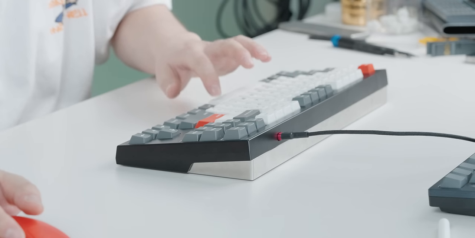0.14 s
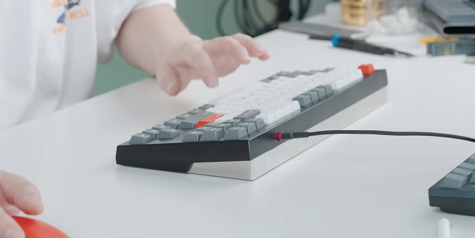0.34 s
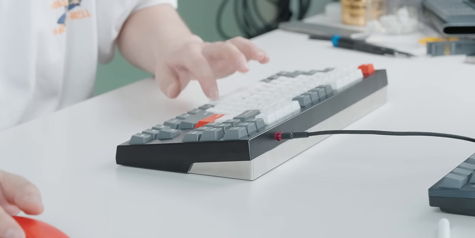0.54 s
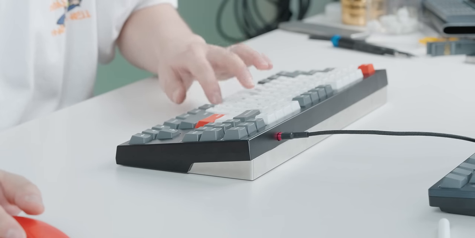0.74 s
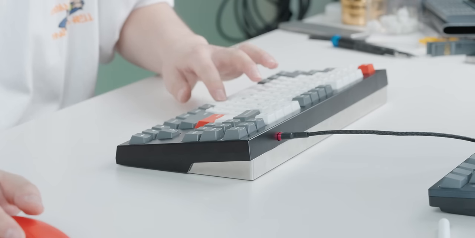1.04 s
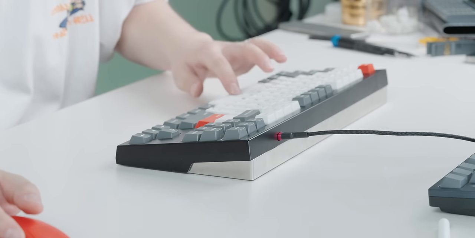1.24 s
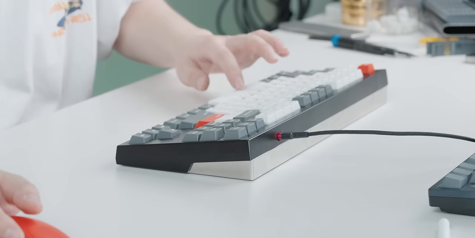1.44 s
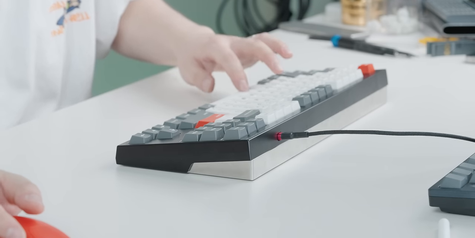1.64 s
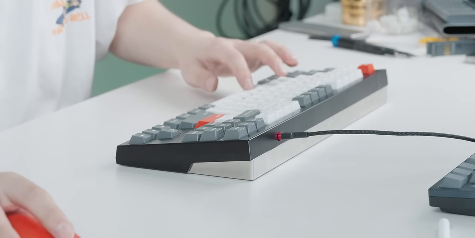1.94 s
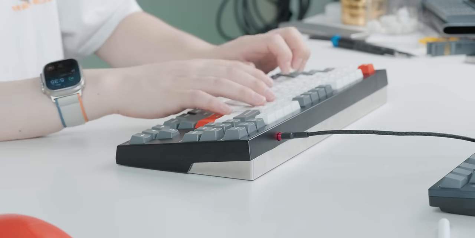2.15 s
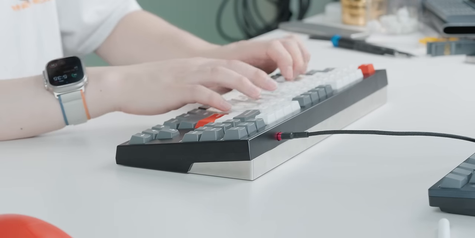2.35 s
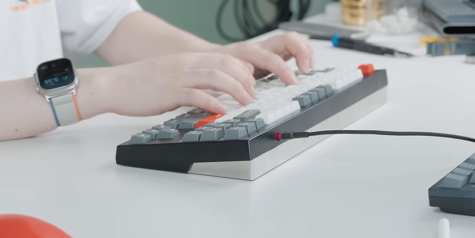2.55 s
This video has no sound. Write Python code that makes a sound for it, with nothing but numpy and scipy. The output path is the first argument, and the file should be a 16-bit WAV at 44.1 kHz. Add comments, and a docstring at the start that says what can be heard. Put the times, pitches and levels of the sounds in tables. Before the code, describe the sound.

Sharp, hard keyboard key taps with softer release clicks, ending in quick uneven two-handed typing

```python
"""One finger taps a wide key of a metal-cased mechanical keyboard on a desk, then both hands type on small keys.
Each stroke is a blow and a rebound: a decaying cap tone, decaying case modes and a crack of coloured noise.
The stem bottoms out on the press and springs back against its stop on the return.
Landing fingertips tick on the caps as noise bursts and a dull tone; brushing fingers hiss as filtered noise.
Noise tails and one wall echo form the room's answer; low filtered noise rumbles in the gaps."""
import sys
import numpy as np
from scipy import signal
from scipy.fft import rfft, irfft, next_fast_len
from scipy.io import wavfile

SR = 44100
rng = np.random.default_rng(int(sys.argv[2]) if len(sys.argv) > 2 else 0)


def log_audio(samples):
    """Write samples as a 16-bit WAV file to the path given in sys.argv[1]."""
    # one column per channel
    frames = np.atleast_2d(samples).T
    # limit to full scale, then quantise
    limited = np.clip(frames, -1, 1)
    pcm = np.round(limited * 32767).astype(np.int16)
    wavfile.write(sys.argv[1], SR, pcm)


N = 119070

# Strokes of the wide key bottoming out, of its springing back, and of the small keys:
# start_s, level_db (peak of the direct blow), cap_pitch_hz, case_db (against the cap),
# rebound_delay_s, rebound_db (against the blow)
WIDE_PRESSES = [(0.118, -0.5, 2100, -15.6, 0.0025, -8.3), (0.2952, -1.5, 2050, -15.0, 0.0014, -13.0),
                (0.4602, -1.1, 2050, -14.5, 0.0023, -12.4), (0.6237, -2.0, 2020, -14.0, 0.002, -13.8),
                (0.7863, -2.7, 2040, -13.9, 0.0023, -8.3), (0.9415, -4.4, 2000, -15.4, 0.0023, -5.2),
                (1.1067, -10.7, 2040, -18.1, 0.0024, -6.1), (1.246, -6.8, 2060, -15.5, 0.0026, -4.8),
                (1.3864, -5.9, 2040, -14.7, 0.0027, -5.9), (1.5378, -6.8, 2020, -13.8, 0.0023, -5.3),
                (1.6841, -6.7, 2020, -13.9, 0.002, -9.7), (1.8327, -5.5, 2010, -14.8, 0.0021, -10.6),
                (1.9655, -2.7, 2010, -15.6, 0.0021, -14.4), (2.4859, -6.3, 2110, -11.6, 0.0022, -6.7)]
WIDE_RETURNS = [(0.1971, -11.1, 1850, -19.2, 0.0062, -12.0), (0.3644, -13.2, 1830, -18.2, 0.0028, -13.3),
                (0.5314, -13.6, 1820, -16.9, 0.0053, -12.9), (0.691, -12.8, 1830, -16.1, 0.0028, -13.5),
                (0.856, -14.7, 1830, -17.1, 0.0049, -7.0), (1.0201, -16.7, 1820, -18.9, 0.0048, -8.0),
                (1.1717, -19.0, 1790, -18.9, 0.0045, -8.5), (1.3186, -19.3, 1810, -17.7, 0.004, -10.6),
                (1.4602, -17.6, 1810, -18.5, 0.0045, -9.2), (1.6038, -15.5, 1820, -17.7, 0.0046, -7.3),
                (1.751, -14.3, 1810, -17.8, 0.0052, -8.6), (1.893, -13.4, 1830, -18.0, 0.0025, -16.8),
                (2.0407, -13.4, 1820, -16.9, 0.0052, -10.4)]
SMALL_STROKES = [(2.238, -23.2, 3850, -3.1, 0.0016, -7.8), (2.2568, -15.9, 3060, -8.1, 0.0021, -13.4),
                 (2.3207, -10.9, 3600, -3.8, 0.002, -19.0), (2.3687, -22.8, 1750, -1.1, 0.0035, -19.5),
                 (2.3835, -14.4, 4350, -3.1, 0.0022, -14.1), (2.5547, -12.5, 3500, -4.5, 0.0031, -6.9),
                 (2.6288, -30.4, 1610, -5.5, 0.0017, -7.5), (2.6502, -13.8, 3650, -4.6, 0.0026, -17.3)]
# How each kind of stroke excites the key: cap_t60_s, mode_t60_factor, attack_s, tilt_db_per_octave,
# crack_db, crack_t60_s, rebound_pitch_ratio, room_db
PRESS_KIND = (.0075, 1.05, .00017, -.4, -25, .008, .97, -.1)
RETURN_KIND = (.0065, 1.8, .00017, -3.5, -27.5, .02, .85, 2.5)
SMALL_KIND = (.004, 1.05, .00012, .1, -19, .008, .52, 2)
# Modes of plate and case, before each stroke's tilt, scatter and t60 factor:
# pitch_hz, level_db, t60_s, polarity (against the cap)
WIDE_KEY_MODES = [(370, -7, .02, 1), (700, -21, .02, -1), (1270, -1.5, .009, -1), (1560, 4, .013, -1),
                  (2680, 2, .009, -1), (2950, 3.5, .006, -1), (3620, -3, .007, 1), (4230, -6.5, .006, -1),
                  (4680, 0.5, .007, 1), (5200, -8, .006, 1), (6230, -5, .005, -1), (7900, -11, .005, 1),
                  (9220, -19, .006, -1), (12200, -11, .004, 1), (13900, -10.5, .004, -1)]
# Modes under the small keys: pitch_hz, level_db, t60_s, polarity (against the cap)
SMALL_KEY_MODES = [(390, -20, .015, 1), (1760, -11, .01, 1), (2200, -11, .007, -1), (2800, -7, .007, 1),
                   (3600, -3, .008, -1), (4600, -6, .005, 1), (6200, -11, .004, -1), (8000, -14, .004, 1),
                   (10400, -13, .004, -1), (12500, -16, .004, 1)]
# Spectrum of a crack: frequency_hz, level_db
CRACK_SPECTRUM = [(300, -22), (700, -10), (1500, -2), (5000, -3), (8500, -9), (12000, -10), (15000, -12),
                  (16500, -28)]
# Fingertips landing on a cap: start_s, level_db, dull_delay_s, dull_db (against the level)
FINGER_TOUCHES = [(.1075, -45, .004, 8), (.2825, -46, .004, 9), (.4475, -46, .004, 9), (.612, -46, .004, 8),
                  (.7741, -46, .004, 8), (.921, -48, .005, 8), (1.067, -53, .006, 8),
                  (1.2166, -54, .005, 8), (1.3538, -56, .004, 3), (1.508, -55, .004, 3),
                  (1.6586, -54, .004, 3), (1.8103, -55, .004, 3), (1.9355, -50, .013, 3),
                  (2.0144, -50, .006, 4), (2.3092, -42, .003, -5), (2.3441, -44, .002, 8),
                  (2.4119, -41, .003, -5), (2.4199, -41, .008, -5), (2.4563, -50, .005, -3),
                  (2.478, -36, .003, -3), (2.5311, -50, .004, -3), (2.635, -48, .003, -5),
                  (2.661, -46, .003, -5)]
# Fingers brushing over the caps: time_s, level_db
BRUSH_LEVEL = [(2.235, -110), (2.245, -64), (2.3, -66), (2.4, -62), (2.44, -66), (2.46, -58), (2.5, -60),
               (2.6, -62), (2.7, -66)]
# Spectrum of the brushing: frequency_hz, density_db_per_hz
BRUSH_SPECTRUM = [(500, -30), (1500, -1), (4000, -2), (7000, -13), (11000, -17), (16000, -30)]
# Decay of the room tail: frequency_hz, t60_s
ROOM_DECAY = [(300, .2), (2000, .25), (6000, .24), (14000, .21)]
# Spectrum of the room's answer: frequency_hz, level_db
ROOM_SPECTRUM = [(300, -6), (1100, -.5), (2000, -2), (3900, 5), (5000, .5), (7500, 7), (11000, 6),
                 (15000, 2.5)]
# Spectrum of the rumble: frequency_hz, density_db_per_hz
RUMBLE_SPECTRUM = [(15, -50), (40, -27), (65, -10), (95, -10), (125, -.1), (170, -5), (300, -7), (450, -16),
                   (750, -24), (1000, -34), (1500, -42), (2500, -52), (4000, -70), (16000, -80)]

BLOW_SAMPLES, ANSWER_SAMPLES = SR // 30, SR // 4
MODE_SCATTER_DB, LOW_CUT_HZ = 2.5, 900  # each key's ring is high-passed, so it carries little bass
TICK_T60_S, DULL_HZ, DULL_T60_S = .009, 1250, .012
SECOND_TICK_DB, SLIDE_DB, SLIDE_T60_S = -4, -10, .06  # slide: the stem rubbing in its guide
TAIL_DB, WALL_DELAY_S, WALL_DB, NEAR_DB, NEAR_T60_S = -25, .0115, -32, -21, .035
RUMBLE_DB = -58  # RMS
TOP_HZ = 16600


def keys(strokes, modes, kind):
    """Impact and restitution: each blow is followed by a rebound at its own pitch and level."""
    start_s, level_db, cap_hz, case_db, delay_s, rebound_db = np.transpose(strokes)[:, :, None]
    *_, pitch_ratio, room_db = kind
    t = blow_time(start_s)
    blow = contact(t, cap_hz, case_db, modes, kind)
    rebound = contact(t - delay_s, pitch_ratio * cap_hz, case_db, modes, kind)
    stroke = blow + amp(rebound_db) * rebound
    peak = abs(blow).max(axis=1, keepdims=True)
    return placed(start_s, amp(level_db) / peak * room(stroke, room_db))


def contact(t, cap_hz, case_db, modes, kind):
    """Modal excitation: a blow rings the cap and the case as decaying sines, with a noisy crack."""
    cap_t60, t60_factor, attack, tilt_db, crack_db, crack_t60, *_ = kind
    t = np.maximum(t, 0)
    cap = decay(t, cap_t60) * np.sin(2 * np.pi * cap_hz * t)
    scatter_db = MODE_SCATTER_DB * rng.standard_normal((len(t), len(modes)))
    case = 0
    for k, (hz, db, t60, polarity) in enumerate(modes):
        mode_db = db + tilt_db * np.log2(hz / cap_hz) + scatter_db[:, [k]]
        ring = decay(t, t60_factor * t60) * np.sin(2 * np.pi * hz * t)
        case = case + np.sign(polarity) * amp(mode_db) * ring
    onset = 1 - np.exp(-t / attack)
    body = (cap + amp(case_db) * case) * onset
    low_cut = signal.butter(2, LOW_CUT_HZ, "high", fs=SR, output="sos")
    return signal.sosfilt(low_cut, body) + amp(crack_db) * burst(t, crack_t60)


def burst(t, t60):
    """Broadband impact noise: coloured noise dying exponentially from t = 0."""
    noise = coloured(rng.standard_normal(t.shape), CRACK_SPECTRUM)
    return noise / noise.std() * decay(t, t60) * (t > 0)


def touches():
    """Two-stage contact: a bright tick with sliding friction, then a dull tick as the stem's slack closes."""
    start_s, level_db, delay_s, dull_db = np.transpose(FINGER_TOUCHES)[:, :, None]
    t = blow_time(start_s)
    late = np.maximum(t - delay_s, 0)
    first_tick = burst(t, TICK_T60_S)
    dull = amp(dull_db) * decay(late, DULL_T60_S) * np.sin(2 * np.pi * DULL_HZ * late)
    second_tick = amp(SECOND_TICK_DB) * burst(late, TICK_T60_S)
    slide = amp(SLIDE_DB) * burst(t, SLIDE_T60_S)
    touch = first_tick + dull + second_tick + slide
    return placed(start_s, amp(level_db) * room(touch, wet_db=2.5))


def brush():
    """Sliding friction: soft filtered noise whose level follows the hands over the caps."""
    noise = coloured(rng.standard_normal(N), BRUSH_SPECTRUM)
    level_db = np.interp(np.arange(N) / SR, *np.transpose(BRUSH_LEVEL))
    return amp(level_db) * noise / noise.std()


def room(x, wet_db):
    """Reverberation by convolution: desk scatter, one wall echo and a tail dying by band, new for each row."""
    noise = rng.standard_normal((2, len(x), ANSWER_SAMPLES))
    hz, t, bands = signal.stft(noise[0], SR, nperseg=256)
    bands = bands * decay(t, along(ROOM_DECAY, hz)[:, None])
    tail = signal.istft(bands, SR, nperseg=256)[1][:, :ANSWER_SAMPLES]
    near = noise[1] * decay(np.arange(ANSWER_SAMPLES) / SR, NEAR_T60_S)
    # the first row sets the energy of tail and desk scatter
    answer = amp(TAIL_DB) * tail / np.linalg.norm(tail[0])
    answer += amp(NEAR_DB) * near / np.linalg.norm(near[0])
    answer[:, round(WALL_DELAY_S * SR)] += amp(WALL_DB)
    wet = signal.fftconvolve(x, answer, axes=1)[:, :ANSWER_SAMPLES]
    direct = np.pad(x, ((0, 0), (0, ANSWER_SAMPLES - x.shape[1])))
    return direct + amp(wet_db) * coloured(wet, ROOM_SPECTRUM)


def rumble():
    """Stationary background noise: random noise shaped to a low spectrum at a steady level."""
    noise = coloured(rng.standard_normal(N), RUMBLE_SPECTRUM)
    return amp(RUMBLE_DB) * noise / noise.std()


def amp(db):
    """Decibel law: level in dB to amplitude ratio."""
    return 10 ** (np.asarray(db) / 20)


def decay(t, t60):
    """Exponential damping: the amplitude falls by 60 dB in t60 seconds."""
    return amp(-60 * t / t60)


def along(points, hz):
    """Logarithmic frequency scale: (Hz, value) points interpolated on a log axis."""
    f, value = np.transpose(points)
    return np.interp(np.log(hz + 1), np.log(f + 1), value)


def coloured(x, points):
    """Linear filtering: the spectrum of x multiplied by a (Hz, dB) curve."""
    n = x.shape[-1]
    m = next_fast_len(n + 1024, True)
    gain = amp(along(points, np.fft.rfftfreq(m, 1 / SR)))
    return irfft(rfft(x, m) * gain, m)[..., :n]


def blow_time(start_s):
    """Local time: one row of seconds from the onset for each event."""
    return np.arange(BLOW_SAMPLES) / SR * np.ones_like(start_s)


def placed(times, rows):
    """Superposition: each row is added in at its start time."""
    out = np.zeros(N + SR)
    for s, x in zip(times.ravel(), rows):
        out[round(s * SR):][:len(x)] += x
    return out[:N]


def scene():
    """Superposition of the key strokes, fingertip sounds and rumble in one channel."""
    wide = keys(WIDE_PRESSES, WIDE_KEY_MODES, PRESS_KIND) + keys(WIDE_RETURNS, WIDE_KEY_MODES, RETURN_KIND)
    small = keys(SMALL_STROKES, SMALL_KEY_MODES, SMALL_KIND)
    return (wide + small + touches() + brush() + rumble())[None]


def record(dry):
    """Band limiting: nothing is kept at or above the top frequency."""
    m = next_fast_len(N + 4096)
    passed = np.fft.rfftfreq(m, 1 / SR) < TOP_HZ
    return irfft(rfft(dry, m) * passed, m)[:, :N]


dry = scene()
out = record(dry)
log_audio(out)
```